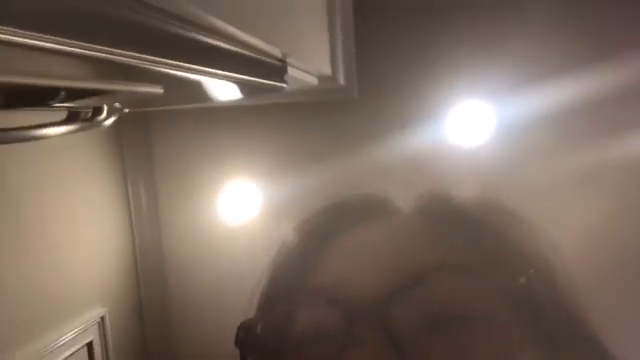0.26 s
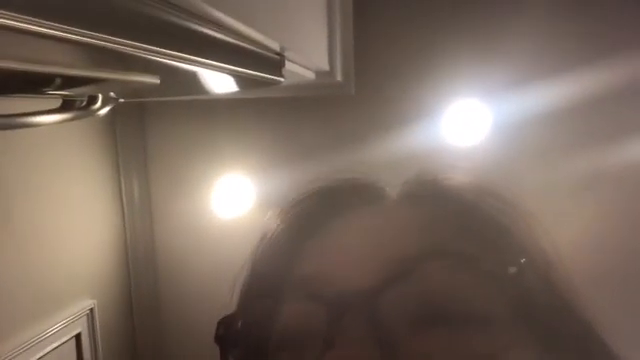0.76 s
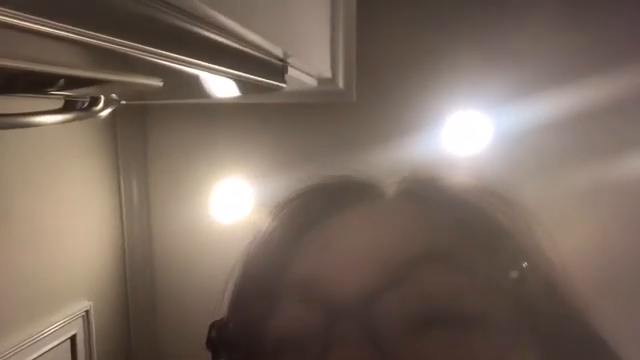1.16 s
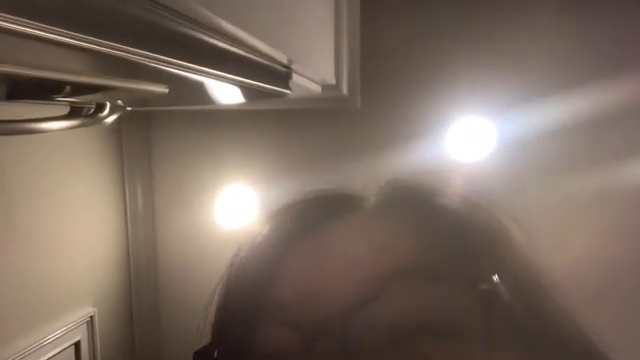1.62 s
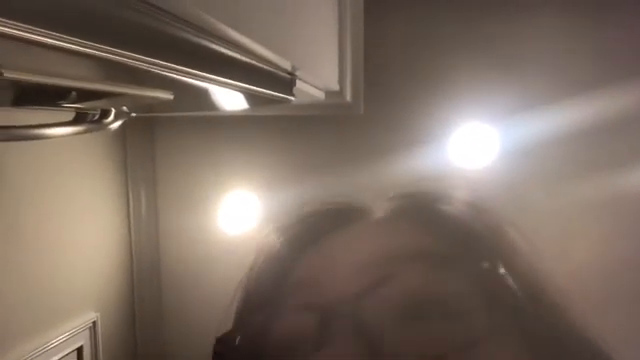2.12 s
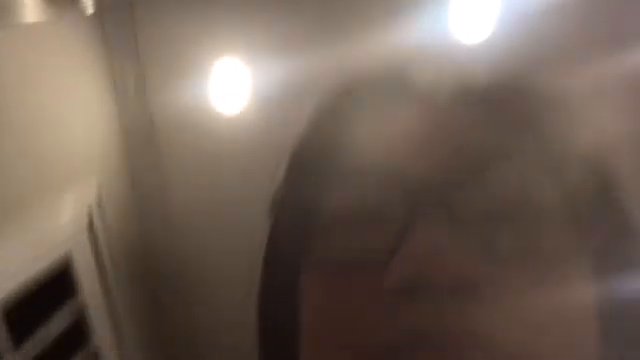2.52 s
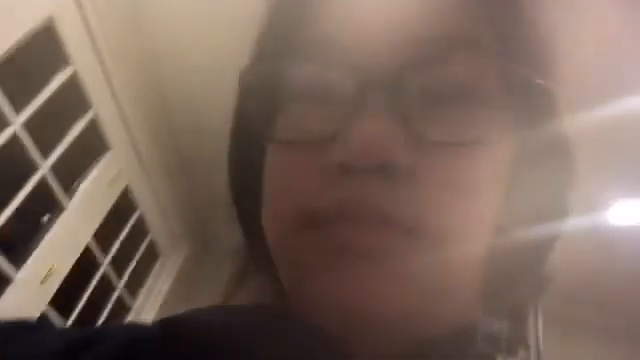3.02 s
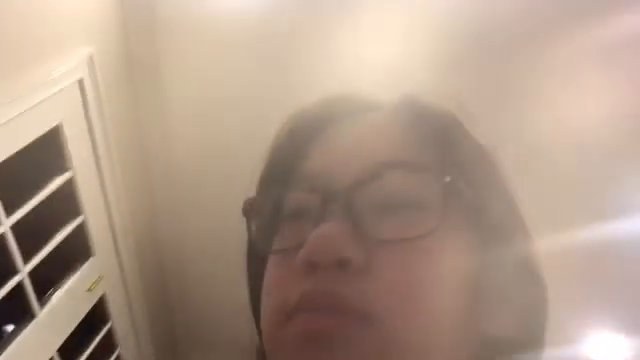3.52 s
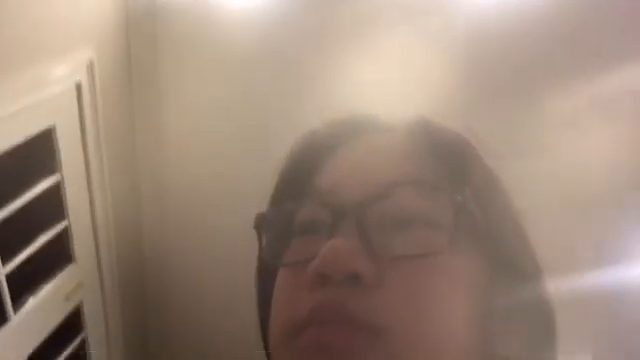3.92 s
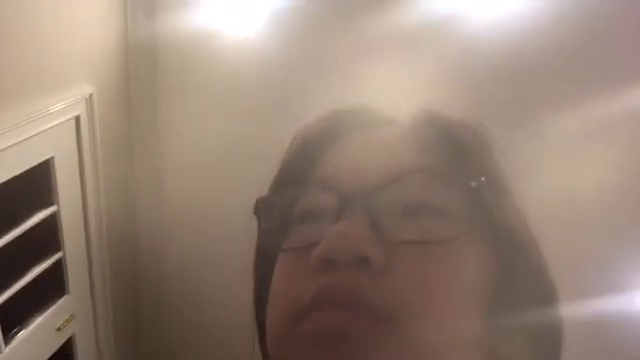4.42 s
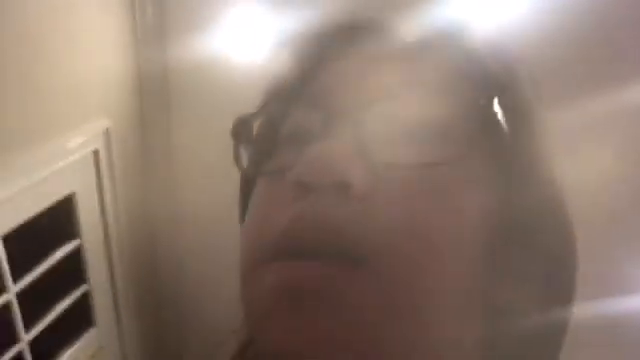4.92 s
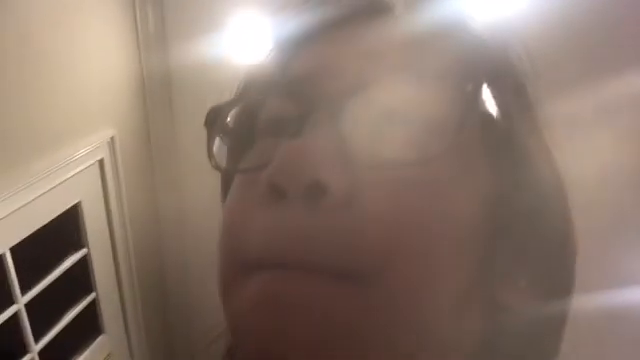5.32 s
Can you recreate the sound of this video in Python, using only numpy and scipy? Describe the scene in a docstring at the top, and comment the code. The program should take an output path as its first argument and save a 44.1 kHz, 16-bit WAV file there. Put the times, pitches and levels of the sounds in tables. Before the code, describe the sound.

Very close to the microphone, someone rummages in a kitchen drawer. Utensils slide and knock against the tray, then after a brief lull a handful tumbles with a loud metallic clatter. Pieces settle, are shuffled and scraped, and the action thins to light clinks, a soft double thud and last clicks. A small hard room answers briefly over a quiet low hiss.

```python
"""Someone rummages in a kitchen drawer close by: utensils slide and knock on the tray, a handful tumbles
with a loud clatter, then things are shuffled about and a few last pieces click.
Each contact is a chattering force driving drawer thud, tray knock and damped steel; sliding and shuffling
are stick-slip noise coloured by the rubbed body; a small hard kitchen answers over still air."""
import sys
import numpy as np
from scipy import signal
from scipy.fft import rfft, irfft, next_fast_len
from scipy.io import wavfile
from scipy.ndimage import map_coordinates

SR = 44100
rng = np.random.default_rng(int(sys.argv[2]) if len(sys.argv) > 2 else 0)


def transcribe(signal):
    """Save signal, clipped to [-1, 1], as a 16-bit WAV file at the path in sys.argv[1]."""
    frames = np.atleast_2d(signal).T
    limited = np.clip(frames, -1, 1)
    pcm = np.round(limited * 32767).astype(np.int16)
    wavfile.write(sys.argv[1], SR, pcm)


N = 245231

HANDLE_HZ = 3650  # main bending mode of the handles
PUSH_DEPTH_DB = 20  # a push swells this much over its rise and fades as much over its fall
# pushes of the hand among the utensils:
# (peak time [s], rise [s], fall [s], level [dB], steel over tray [dB])
PUSHES = [(2.554, 0.19, 0.079, -48, -8.5), (2.692, 0.15, 0.24, -40.5, -6.5), (2.829, .2, .12, -36, -8),
          (3.032, 0.14, 0.26, -49, -5.5), (3.13, 0.21, 0.069, -45.5, -8.5), (3.24, 0.52, 0.36, -61, 4.5),
          (3.49, 0.21, .1, -51.5, 3.5), (4.46, .11, 0.15, -71, 10), (4.56, 0.049, 0.073, -50.5, -15),
          (4.84, 0.37, 0.33, -57.5, -7.5), (4.97, .1, 0.28, -58.5, -8.5), (5.56, 0.23, .1, -64.5, 0)]


def amp(db):
    """Decibels to gain."""
    return 10 ** (np.asarray(db) / 20)


def unit(x):
    """x at rms 1."""
    return x / np.sqrt(np.mean(x ** 2) + 1e-20)


def along(points, hz):
    """(frequency [Hz], value) points interpolated on a log-frequency axis."""
    f, v = np.transpose(points)
    return np.interp(np.log(hz + 1), np.log(f + 1), v)


def wobble(knots_per_s):
    """A smooth random curve through normally distributed knots."""
    knots = rng.standard_normal(int(N * knots_per_s / SR) + 4)
    return map_coordinates(knots, [np.arange(N) * knots_per_s / SR])


def filtered(x, response):
    """x times a complex response of frequency."""
    m = next_fast_len(len(x) + len(x) // 8)
    return irfft(rfft(x, m) * response(np.fft.rfftfreq(m, 1 / SR)), m)[:len(x)]


def mode(f, hz, width_hz):
    """Response of one causal resonance with a peak gain of 1."""
    return 1j * f * width_hz / (hz * hz - f * f + 1j * f * width_hz)


def modes(f, table):
    """Response of a body with several resonances in parallel."""
    return sum(amp(db) * mode(f, hz, width_hz) for hz, width_hz, db in table)


def band(lo_hz, hi_hz, order):
    """A causal band-pass, as a function of the signal."""
    sos = signal.butter(order, [lo_hz, min(hi_hz, SR / 2 - 1)], "band", fs=SR, output="sos")
    return lambda x: signal.sosfilt(sos, x)


def still_air():
    """Steady coloured noise of the quiet room."""
    # background spectrum: (frequency [Hz], relative level [dB])
    air_colour = [(20, -2), (75, -0.5), (160, -3.5), (400, -6), (1500, -16), (6000, -22.5), (16000, -37)]
    noise = rng.standard_normal(N)
    return amp(-63) * unit(filtered(noise, lambda f: amp(along(air_colour, f))))


def kitchen(x, build_s):
    """Room tail: noise that builds up quickly, then dies at its own speed at each frequency."""
    # decay: (frequency [Hz], t60 [s])
    t60_points = [(120, 0.97), (400, 0.77), (1100, 0.25), (2500, 0.31), (7000, 0.19), (15000, 0.28)]
    # tail spectrum: (frequency [Hz], relative level [dB])
    echo_points = [(60, -9), (200, -10.5), (1000, -15), (2200, -18), (7000, -17.5), (15000, -21.5)]
    hz, t, z = signal.stft(rng.standard_normal(SR), SR, nperseg=256)
    decay = amp(-60 * t / along(t60_points, hz)[:, None]) * (1 - np.exp(-t / build_s))
    decay /= np.sqrt(np.sum(decay ** 2, axis=1, keepdims=True) * t[1] * SR)  # equal energy per bin
    colour = amp(along(echo_points, hz))[:, None]
    tail = signal.istft(z * decay * colour, SR, nperseg=256)[1]
    return signal.fftconvolve(x, tail)[:N]


def thumps():
    """Heavier blows shake the whole cabinet: its lowest modes swell briefly and decay."""
    # blows: (time [s], peak level [dB])
    thump_rows = [(1.639, -33), (0.396, -49), (2.04, -51.5), (2.266, -50), (2.715, -47), (2.797, -53),
                  (4.536, -33.5), (4.57, -35), (4.768, -51.5), (4.928, -51.5)]
    # cabinet modes: (frequency [Hz], relative level [dB], t60 [s])
    cabinet_modes = [(36, -3.5, 0.081), (69.5, -3, 0.73), (101, -4.5, 0.6), (133, 0.5, 0.12),
                     (168, 2.5, .15)]
    out, t = np.zeros(N + SR), np.arange(SR // 2) / SR
    boom = sum(amp(db - 60 * t / t60) * np.sin(2 * np.pi * hz * t) for hz, db, t60 in cabinet_modes)
    boom *= 1 - np.exp(-t / .006)
    boom /= np.abs(boom).max()
    for s, db in thump_rows:
        out[round(s * SR):][:len(t)] += amp(db) * boom
    return out[:N]


def stick_slip(slips_per_s, spread_db, flutter_db):
    """Tiny slips of uneven size, plus noise, under a pressure that keeps changing."""
    sizes = rng.standard_normal(N) * amp(spread_db * np.clip(rng.standard_normal(N), -2, 2))
    slips = unit(sizes * (rng.random(N) < slips_per_s / SR)) + 0.79 * rng.standard_normal(N)
    return slips * amp(flutter_db * wobble(90))


def friction(colour, lo_hz, hi_hz, slips):
    """One band of the stick-slip pulses, coloured by the rubbed body, at rms 1."""
    coloured = filtered(slips, lambda f: amp(along(colour, f)))
    return unit(band(lo_hz, hi_hz, order=4)(coloured))


def jingle(touches_per_s, t60_s, spread_db):
    """Many tiny touches between handles, each ringing two bending modes at its own pitch; rms 1."""
    t, count = np.arange(1024) / SR, int(touches_per_s * N / SR)
    when, pitch, size, mix = rng.random((count, 4)).T[:, :, None]
    phase = 2 * np.pi * HANDLE_HZ * 2 ** (.45 * (pitch - .5)) * t
    rings = mix * np.sin(phase) + (1 - mix) * np.sin(0.26 * phase)
    rings = rings * amp(spread_db * size - 60 * t / t60_s)
    index = (when * N).astype(int) + np.arange(len(t))
    return unit(np.bincount(index.ravel(), rings.ravel(), N)[:N])


def effort(pushes):
    """Gains of drawer, tray and steel: the pushes rise and fall linearly in dB and add in power."""
    drag = 0.33  # dB of drawer rumble lost per dB more of steel: lifted pieces leave the floor
    t, power = np.arange(N) / SR, np.zeros((3, N))
    for peak_s, rise_s, fall_s, db, steel_db in pushes:
        away = np.maximum((peak_s - t) / rise_s, (t - peak_s) / fall_s)
        swell = amp(db - PUSH_DEPTH_DB * away)
        power += np.outer(amp([-drag * steel_db, 0, steel_db]), swell) ** 2
    return np.sqrt(power)


def shuffle(pushes, colour, drawer_db, hiss_db, jingle_db):
    """A hand moves utensils: coarse scraping, small jingles and a finer hiss on top."""
    drawer, tray, steel = effort(pushes)
    coarse = stick_slip(slips_per_s=550, spread_db=4, flutter_db=2.5)
    fine = stick_slip(slips_per_s=1400, spread_db=3, flutter_db=3.0)
    rumble = amp(drawer_db) * drawer * friction(colour, 42, 870, coarse)
    rub = tray * friction(colour, 860, 1741, coarse)
    scrape = amp(-0.5) * friction(colour, 1760, 4828, fine)
    hiss = amp(hiss_db) * friction(colour, 4840, 18000, fine)
    jingles = amp(jingle_db) * jingle(touches_per_s=23, t60_s=0.019, spread_db=5)
    return rumble + rub + steel * (scrape + hiss + jingles)


def stir_and_ease():
    """The whole pile is stirred, then one piece is eased out: friction with a colour for each."""
    # friction spectra: (frequency [Hz], relative level [dB])
    stir_colour = [(30, -36), (70, 6), (130, -9.5), (220, 1), (500, -5), (1500, -5.5), (2400, -13.5),
                   (3700, -15), (5000, -24), (9000, -27), (16000, -37)]
    ease_colour = [(30, -13), (70, 6.5), (150, -4), (300, 0), (500, -18), (1400, -6), (3000, -14),
                   (7000, -22), (16000, -40)]
    ease_from_s = 4  # pushes peaking from here on ease one piece out
    stirring = [p for p in PUSHES if p[0] < ease_from_s]
    easing = [p for p in PUSHES if p[0] >= ease_from_s]
    stir = shuffle(stirring, stir_colour, drawer_db=-1.5, hiss_db=-5.5, jingle_db=-11)
    return stir + shuffle(easing, ease_colour, drawer_db=4, hiss_db=-3, jingle_db=-11)


def slide():
    """Each stroke swells and fades: slips drum on the tray, hiss, and make one handle sing thinly."""
    # strokes of a utensil over the tray:
    # (start [s], end [s], stroke level [dB], tray resonance [Hz])
    stroke_rows = [(-.05, 0.058, -41, 1057), (.085, .313, -48, 770), (.304, 0.496, -42, 750),
                   (.474, 0.6, -38, 1120), (.781, .871, -36.5, 994), (.9, 1, -46.5, 966),
                   (.975, 1.073, -33.5, 1060), (1.082, 1.276, -54, 765), (1.263, 1.416, -54.5, 680),
                   (3.251, 3.329, -48.5, 1590), (3.355, 3.445, -47, 1630)]
    out, t = np.zeros(N), np.arange(N) / SR
    slips = stick_slip(slips_per_s=2700, spread_db=2.5, flutter_db=1.9)
    treble = band(2600, 8200, order=1)
    for start_s, end_s, stroke_db, tray_hz in stroke_rows:
        song_db = -70.5 + 14 * np.log2(tray_hz / 1000)  # a higher stroke makes the handle sing more
        during = (t > start_s) & (t < end_s)
        drive = slips[during]
        pressure = np.sin(np.pi * (t[during] - start_s) / (end_s - start_s))
        tray = band(230, max(1550, 1.2 * tray_hz), order=4)
        # a firmer stroke drives the tray's resonance more cleanly
        rattle = np.clip(.13 * amp(0.27 * (-30.5 - stroke_db)), 0, .6)
        rub = unit(tray(filtered(drive, lambda f: mode(f, tray_hz, 270) + rattle)))
        hiss = unit(treble(treble(drive)))
        song = unit(filtered(drive, lambda f: mode(f, HANDLE_HZ, 220) ** 2))
        out[during] += pressure * (amp(stroke_db - 3) * rub + amp(stroke_db - 27) * hiss)
        # the handle keeps singing even under light pressure
        out[during] += np.sqrt(pressure) * amp(song_db) * song
    return out


def chatter(t, length_s, first, rebounds_per_s):
    """Force of one contact: a first touch, then tiny rebounds that swell and die away."""
    u = t / max(length_s, 1 / SR)
    hits = rng.random(len(t)) < rebounds_per_s / SR
    rebounds = rng.standard_normal(len(t)) * hits * np.sqrt(u) * np.exp(-u)
    force = rebounds / (np.linalg.norm(rebounds) + 1e-9)
    force[0] += first
    return force


def blow(ring, db):
    """A short sound scaled to the energy of 10 ms at this rms level."""
    return amp(db) * np.sqrt(.01 * SR) * ring / np.linalg.norm(ring)


def pings():
    """A loose handle, tapped lightly, rings briefly in two bending modes over a faint broad clack."""
    # taps: (time [s], main mode level [dB], main mode [Hz])
    ping_rows = [(2.191, -36.5, 3440), (2.219, -36.5, 3490), (3.209, -45.5, 3730), (3.781, -53, 3380),
                 (3.795, -50.5, 2980), (3.929, -64, 3180), (3.972, -53, 3066), (4.065, -65.5, 3140),
                 (4.5773, -40.5, 3600)]
    out, t = np.zeros(N + SR), np.arange(4096) / SR
    clack = band(820, 4190, order=2)
    for s, db, hz in ping_rows:
        force = chatter(t, length_s=.002, first=0.8, rebounds_per_s=4500)
        upper = filtered(force, lambda f: mode(f, hz, 480) ** 2)
        lower = filtered(force, lambda f: mode(f, 0.458 * hz, 336) ** 2)
        out[round(s * SR):][:len(t)] += blow(upper, db) + blow(lower, db - 4.5) + blow(clack(force), db - 6.5)
    return out[:N]


def touches():
    """Contact rows of small stray touches, scattered around each push's peak, weaker on its flanks."""
    chatter_s, thud_db, steel_db = 0.0019, 6.5, -3
    tray_hz, steel_hz, octaves = 997, 3258, 0.6  # pitches scatter this far either way
    rows = []
    for peak_s, rise_s, fall_s, push_db, _ in PUSHES:
        for place, size, tray, steel in rng.uniform(-1, 1, (5, 4)):  # five touches a push
            s = peak_s + .5 * place * (fall_s if place > 0 else rise_s)
            db = push_db - 8 + 3 * size - .5 * PUSH_DEPTH_DB * abs(place)
            knock_hz, clink_hz = tray_hz * 2 ** (octaves * tray), steel_hz * 2 ** (octaves * steel)
            rows.append((s, chatter_s, db, thud_db, steel_db, knock_hz, clink_hz))
    return rows


def contacts(rows):
    """Each contact force drives four paths: drawer thud, tray knock, steel clink and a bright tick."""
    # bright modes of the steel, each used twice in cascade:
    # (frequency [Hz], width of one stage [Hz], relative level [dB])
    bright_modes = [(6310, 740, 0), (7030, 2400, -2.5), (9000, 3400, -10.5), (12450, 2300, -12.5)]
    out, t = np.zeros(N + SR), np.arange(4096) / SR
    low, middle = band(140, 380, order=3), band(400, 1400, order=3)
    upper, top = band(1800, 4700, order=3), band(4400, 18000, order=3)

    def shine(f):
        """Response of the bright steel modes."""
        return sum(amp(db) * mode(f, hz, width_hz) ** 2 for hz, width_hz, db in bright_modes)

    for s, chatter_s, db, thud_db, steel_db, knock_hz, clink_hz in rows:
        force = chatter(t, 0.9 * chatter_s, first=0.18, rebounds_per_s=9000)
        thud = low(filtered(force, lambda f: mode(f, 215, 130) + .5))
        knock = middle(filtered(force, lambda f: mode(f, knock_hz, 230) + 0.33))
        # near the handles' own mode a clink rings clean; away from it, it is a broad clack
        octaves_off = np.log2(clink_hz / HANDLE_HZ)
        dull = np.clip(abs(octaves_off) - .07, 0, .3)
        clink_width_hz = 520 + 2500 * dull
        clink = upper(filtered(force, lambda f: mode(f, clink_hz, clink_width_hz) ** 2 + 0.054 + 4.4 * dull))
        # a brief, hard contact is brighter than a long, chattering one
        tick = top(filtered(force, lambda f: (shine(f) + 0.092 + 3 * dull) / (1 + 1j * f * chatter_s / 35)))
        tick_db = steel_db - 5 + 7.5 * octaves_off  # smaller, higher pieces tick more
        for path, over_db in (thud, thud_db - 6), (knock, -.6), (clink, steel_db + .5), (tick, tick_db):
            out[round(s * SR):][:len(t)] += blow(path, db + over_db)
    return out[:N]


def lingering(knocks):
    """The drawer and the pieces of steel ring on in narrow modes after each blow."""
    # (frequency [Hz], width [Hz], relative level [dB])
    drawer_modes = [(178, 37, -7.5), (216, 12, -4), (276.9, 7.4, 3.5), (459.5, 32, 4.5), (526, 23, 1),
                    (581.5, 16, 2), (738, 7.7, -3), (856.7, 16, -3.5), (1170, 2, -9), (1208, 27, -7),
                    (1414, 30, -0.5), (1856, 45, 1)]
    steel_modes = [(1184, 5.4, -4), (1900, 8.3, -2.5), (3490, 45, -6), (3480, 40, -8), (6130, 16, -6)]
    return filtered(knocks, lambda f: modes(f, drawer_modes) + modes(f, steel_modes))


def scene():
    """Contacts, pings and strokes with their ring and room, cabinet thumps, shuffling and still air."""
    # utensils striking the tray and each other; contacts() trims the chatter and each path's level:
    # (time [s], nominal chatter [s], base level [dB], thud offset [dB], steel offset [dB],
    #  tray mode [Hz], steel mode [Hz])
    contact_rows = [(.121, 0.0054, -46, 3.5, -17, 470, 3500), (.3958, 0.0018, -19, -5.5, -35, 760, 3700),
                    (.427, 0.0059, -32, -3, -9.5, 756, 2900), (.4365, 0.0011, -28.5, -10, 5, 504, 3690),
                    (.4665, 0.004, -28, -22, -26, 1290, 3000), (.531, 0.005, -35, -4, -22, 625, 3750),
                    (.553, 0.0012, -31.5, -31, -33, 1220, 2740), (.573, 0.0016, -38, -8.5, -19, 626, 2860),
                    (.6785, 0.0029, -31, -8.5, -25.5, 1345, 3760),
                    (.777, 0.003, -37.5, -2, -34, 1230, 2860), (.8405, 0.002, -26, -2, -33, 764, 3660),
                    (.8895, 0.0012, -28, -4, -27.5, 570, 2770), (1.117, 0.0021, -45, -4, -14, 724, 3000),
                    (1.607, 0.013, -29, 3, -1.5, 685, 3110), (1.617, 0.004, -14, -5.5, -2, 684, 3530),
                    (1.6255, 0.0064, -14, 0, -5, 754, 3100), (1.639, 0.0031, -11, -9, -4, 779.4, 4200),
                    (1.6465, 0.0027, -13.5, -8, -2, 810, 3400), (1.654, 0.0057, -15.5, -12, -12, 514, 3230),
                    (1.718, .0056, -16.5, 0.5, -10, 810, 3100), (1.738, 0.012, -17, -25, -8.5, 970, 2730),
                    (1.7445, 0.0041, -9.5, -12, -10, 870, 3470),
                    (1.7695, 0.0024, -14.5, -6, -22, 1290, 3330),
                    (1.804, 0.0034, -22, -12, -15, 1156, 2780),
                    (1.875, 0.0059, -20.5, -10, -19, 1150, 3300),
                    (1.918, 0.01, -23.5, -11.5, -20, 840, 2850), (2.018, 0.0031, -35.5, 3.5, -5, 923, 3850),
                    (2.035, 0.0045, -28.5, -13, -10, 755, 3620),
                    (2.0405, 0.0028, -29.5, -5.5, -8, 1195, 4170),
                    (2.205, 0.0083, -40.5, 6.5, -26.5, 807, 3550),
                    (2.2655, 0.0034, -22, -7.5, -3, 1336, 2750),
                    (2.421, 0.0021, -44, -1, -14.5, 1134, 2960), (2.548, 0.0076, -38, 2, -15, 786, 3570),
                    (2.571, 0.0015, -42.5, -6, -7, 520, 4000), (2.635, 0.011, -28.5, -17, -11, 1120, 2490),
                    (2.673, 0.011, -36.5, 2, -9, 720, 3220), (2.7, .004, -30.5, -8, -30, 1060, 3350),
                    (2.714, 0.0021, -37.5, 13, -5.5, 820, 3600),
                    (2.7605, 0.0035, -22.5, -4.5, -11, 780, 2980), (2.774, 0.0026, -31.5, 3, -7, 755, 3000),
                    (2.8195, 0.0025, -30.5, -18, 2, 1160, 2420), (2.828, 0.0046, -34, -8, 3.5, 640, 3190),
                    (2.9565, 0.0023, -40, -8, -0.5, 990, 4090), (3.0665, 0.0031, -33, -0.5, -8, 480, 2570),
                    (3.283, 0.0042, -55, 4.5, 5.5, 1500, 3120), (3.4635, .0032, -46.5, 0.5, 7.5, 880, 3200),
                    (3.517, .0017, -55, -6, 10.5, 1380, 3890), (3.555, .0015, -60, -12.5, 10.5, 1532, 3090),
                    (3.741, .0029, -50.5, -5.5, 6, 984, 4016), (4.481, 0.0021, -47, -19.5, 7.5, 1380, 2400),
                    (4.533, .0022, -43, 17, 0.5, 674, 3080), (4.565, 0.005, -49.5, 11, -13, 900, 3470),
                    (4.77, 0.0052, -44, 10.5, -10, 820, 2940), (4.927, 0.0022, -36.5, -6, -1.5, 1207, 2840),
                    (4.849, .003, -54.5, 9, -10, 797, 2970), (4.947, 0.0022, -52.5, -5, 3.5, 1200, 3250),
                    (5.0915, 0.0028, -42.5, 1.5, -1.5, 1094, 4210),
                    (5.168, .005, -49.5, 6.5, -4, 1420, 2560)]
    knocks = contacts(contact_rows) + pings() + slide() + contacts(touches())
    room = amp(2.5) * kitchen(knocks, build_s=.008)
    return (knocks + lingering(knocks) + room + thumps() + stir_and_ease() + still_air())[None]


def record(dry):
    """The loudest blows are rounded off near full scale; a steep low-pass limits the band."""
    top_hz = 15800
    rounded = dry[0] / (1 + np.abs(dry[0] / .98) ** 6) ** (1 / 6)
    return filtered(rounded, lambda f: 1 / np.sqrt(1 + (f / top_hz) ** 160))[None]


dry = scene()
out = record(dry)
transcribe(out)
```